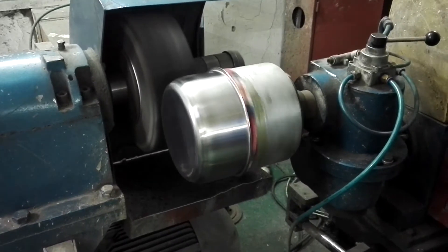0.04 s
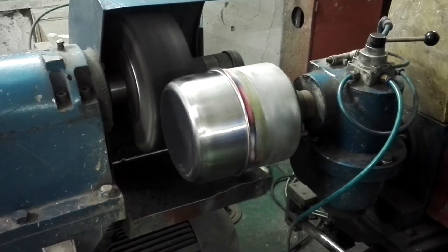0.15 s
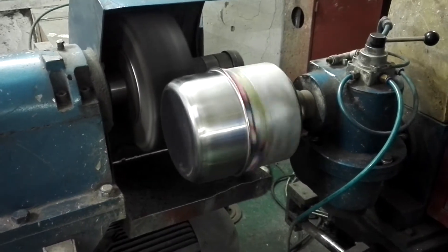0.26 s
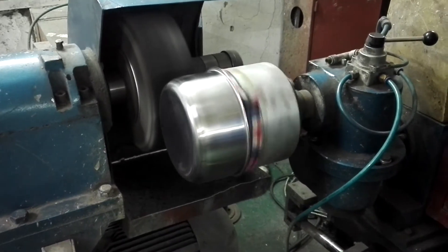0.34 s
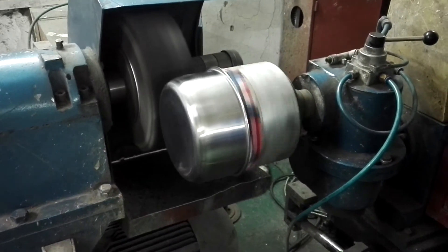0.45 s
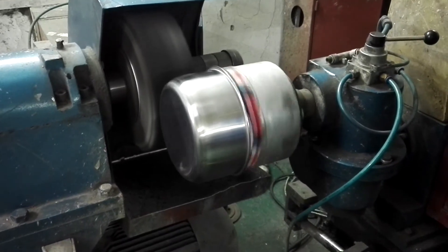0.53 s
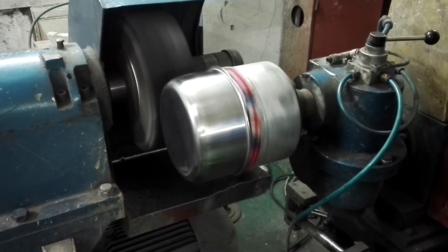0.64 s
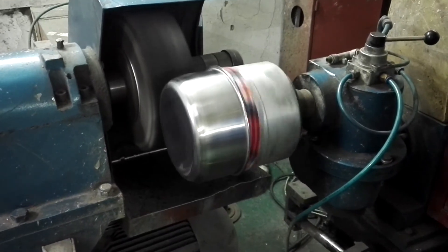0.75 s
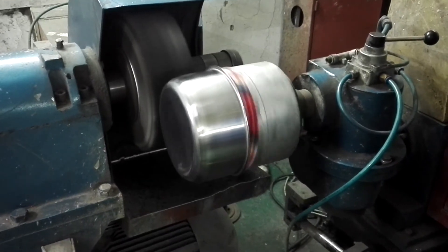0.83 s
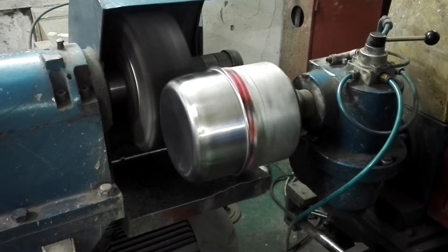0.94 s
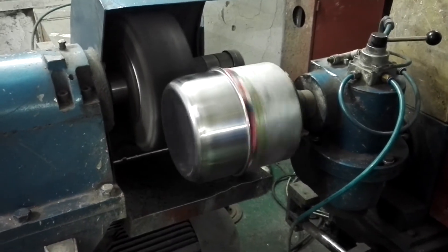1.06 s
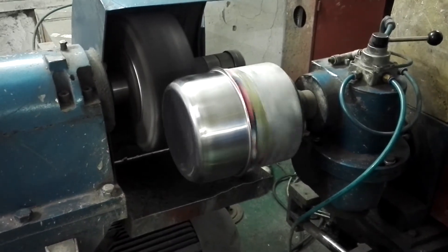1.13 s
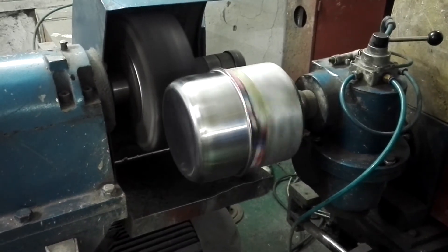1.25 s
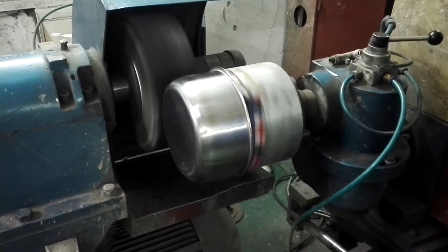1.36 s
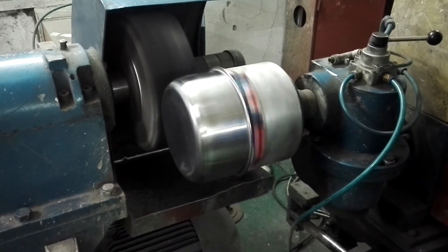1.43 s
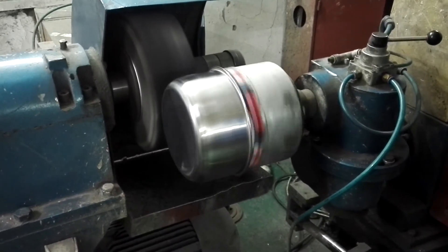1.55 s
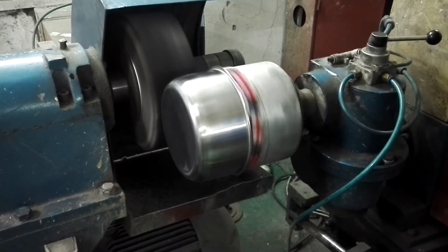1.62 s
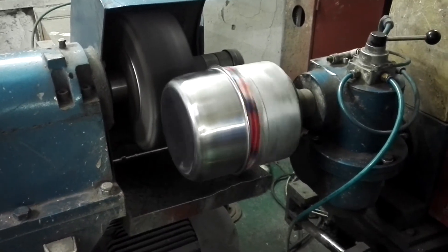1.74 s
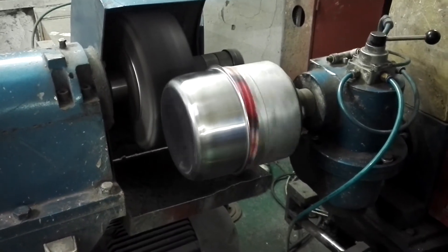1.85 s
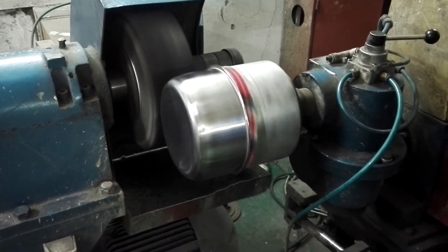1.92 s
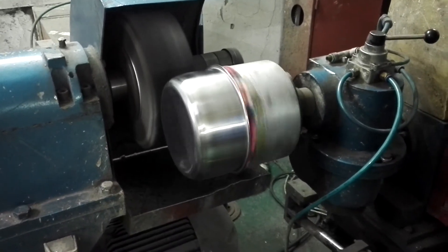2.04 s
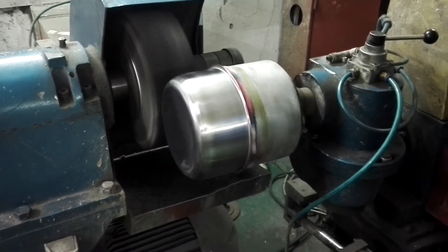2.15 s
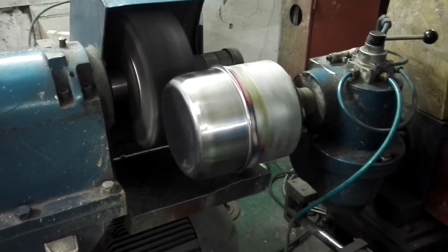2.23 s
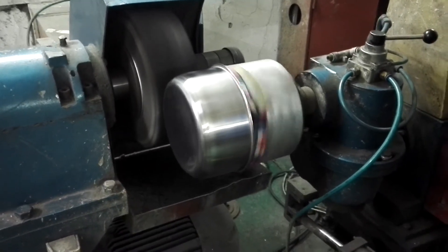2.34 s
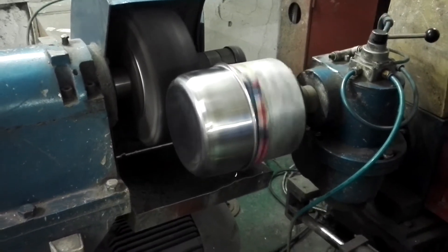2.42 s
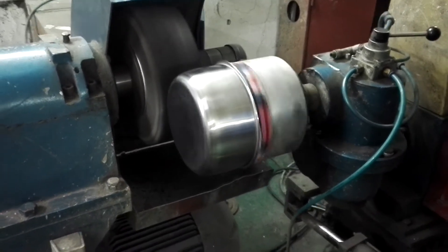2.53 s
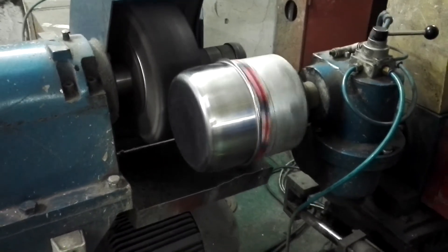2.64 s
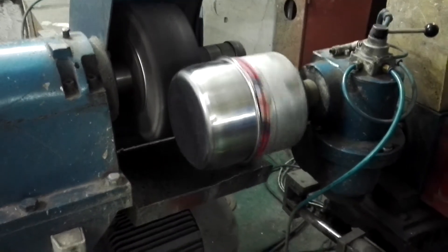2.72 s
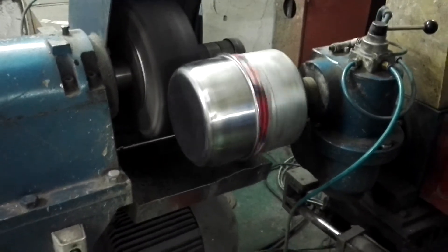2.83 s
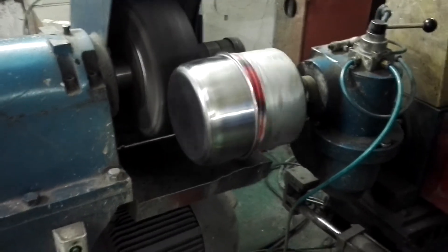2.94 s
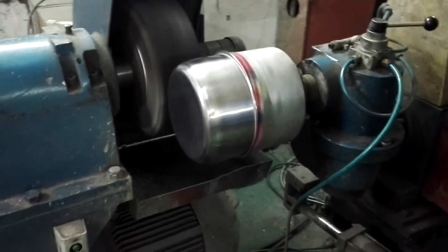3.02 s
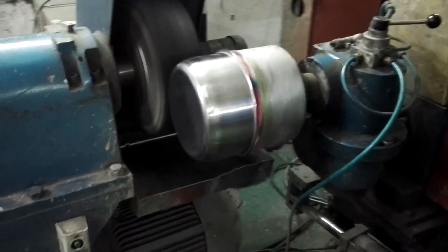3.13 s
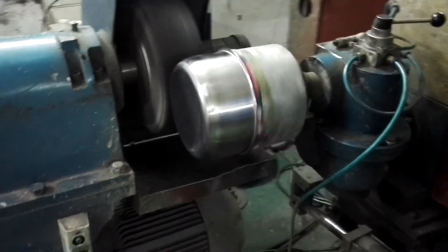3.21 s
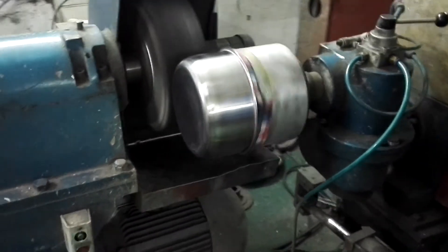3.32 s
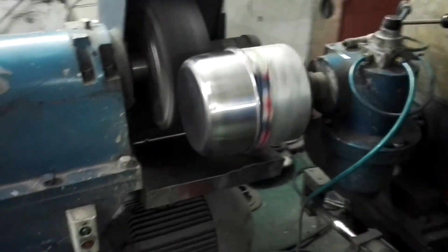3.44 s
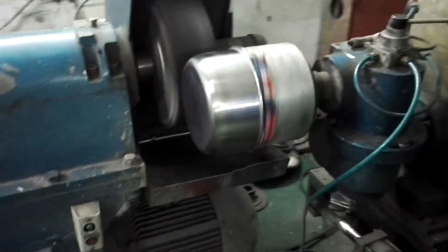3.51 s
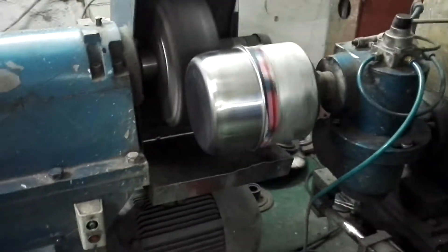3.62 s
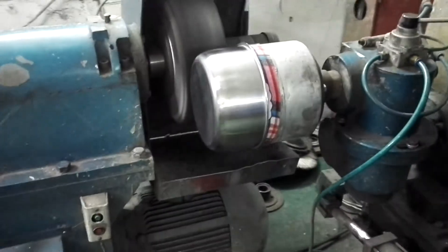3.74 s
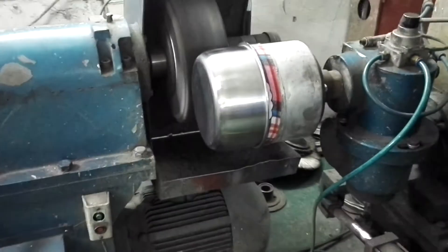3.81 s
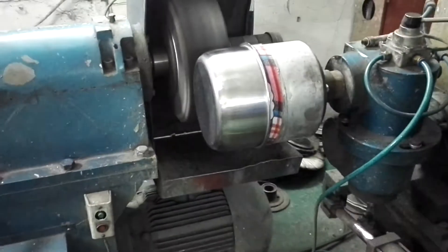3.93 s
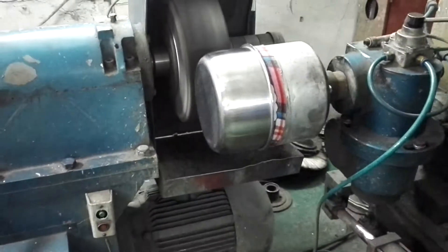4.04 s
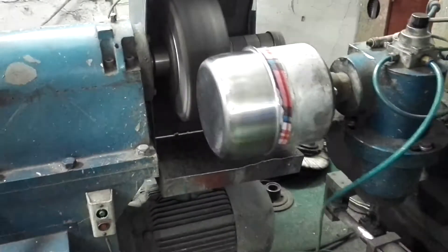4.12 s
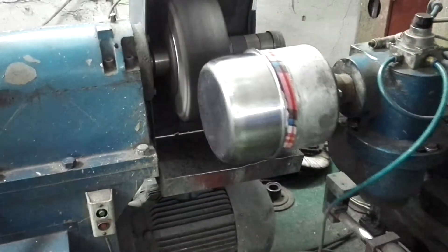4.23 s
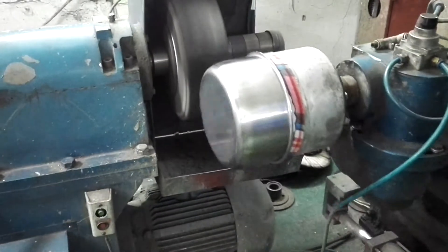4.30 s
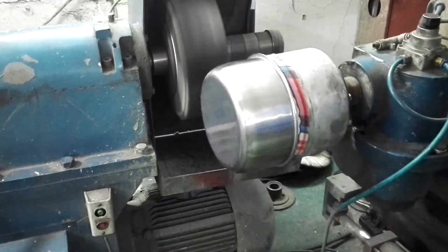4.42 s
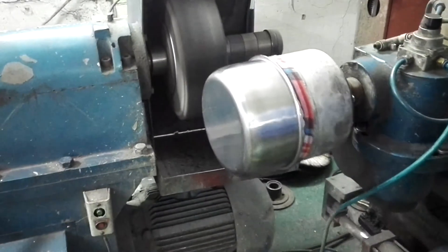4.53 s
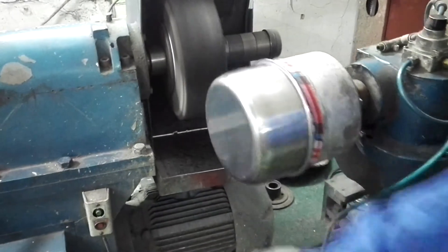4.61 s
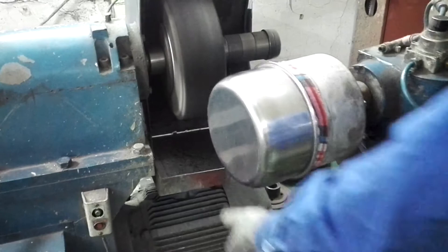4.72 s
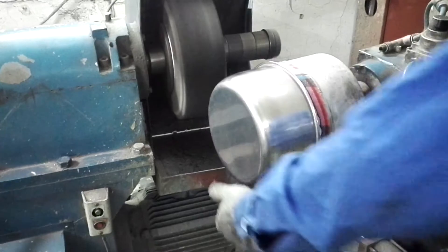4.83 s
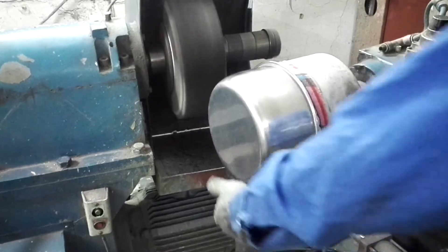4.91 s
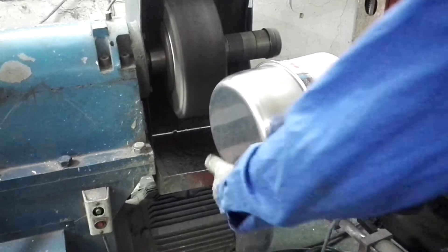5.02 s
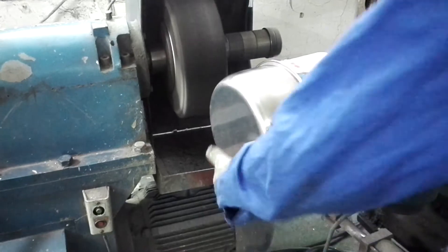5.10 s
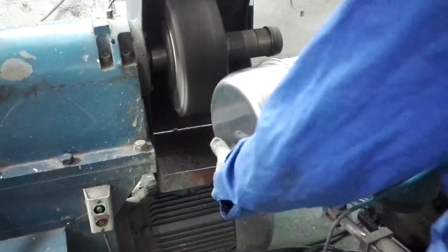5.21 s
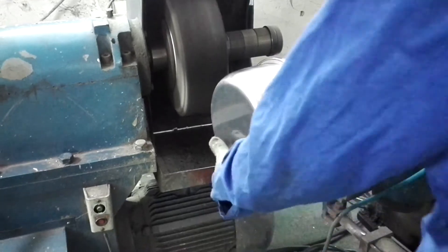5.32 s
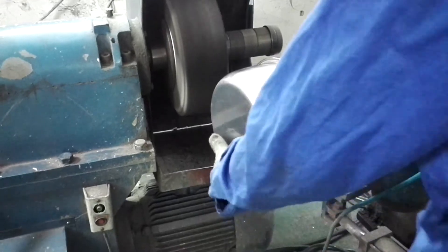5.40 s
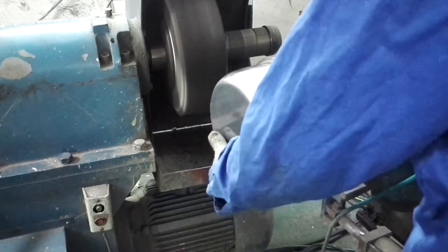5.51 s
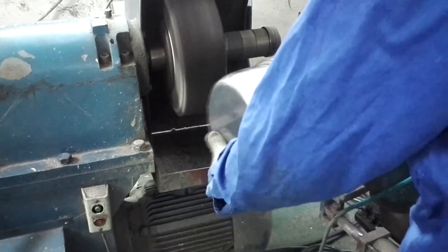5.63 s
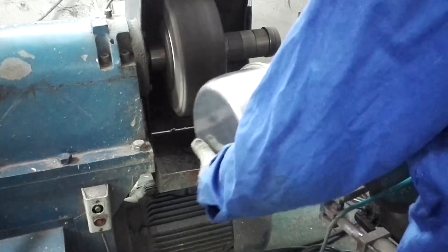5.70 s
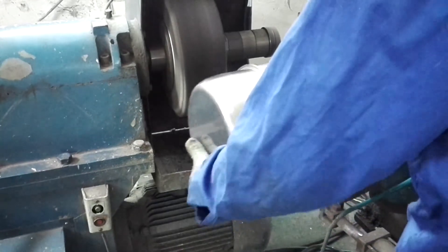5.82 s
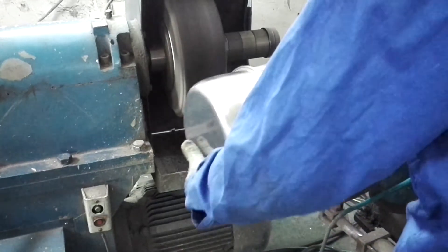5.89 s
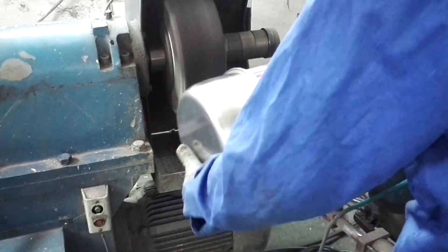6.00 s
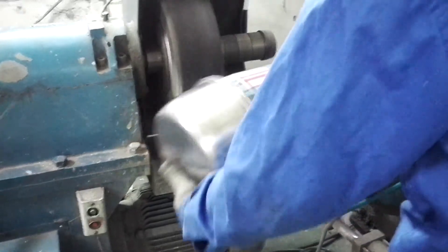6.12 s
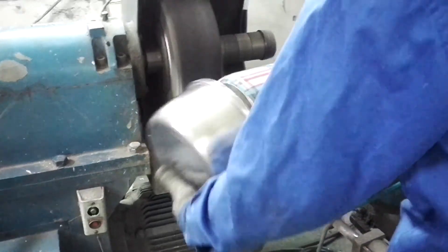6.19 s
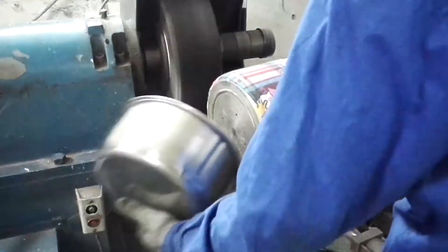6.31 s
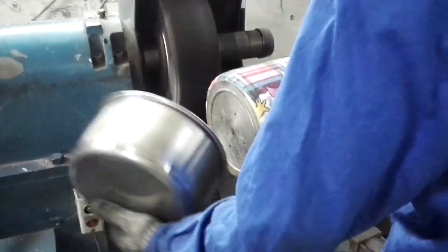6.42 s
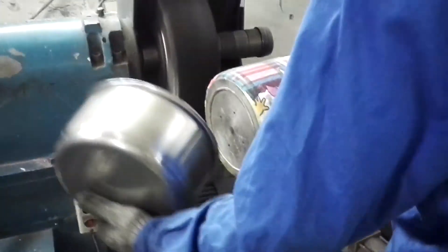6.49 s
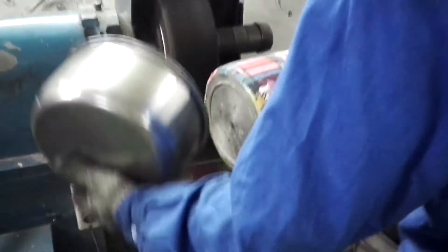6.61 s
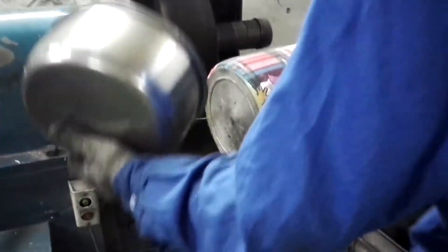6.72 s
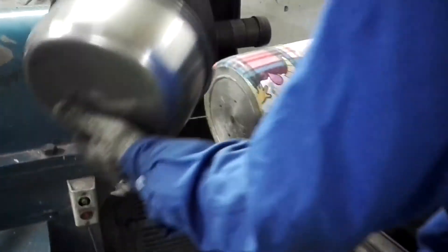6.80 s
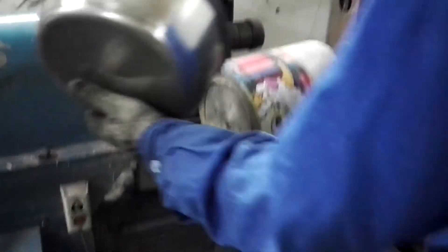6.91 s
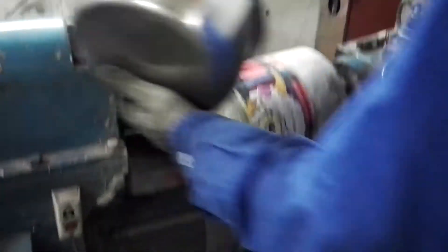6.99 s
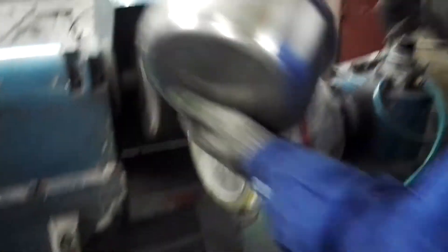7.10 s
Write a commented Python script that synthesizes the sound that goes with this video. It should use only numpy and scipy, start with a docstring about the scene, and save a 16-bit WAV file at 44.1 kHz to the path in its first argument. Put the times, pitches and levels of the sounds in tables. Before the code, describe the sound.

From 0 to 2.9 seconds, a flap wheel grinds a steel pot close by: dense, loud, bright gritty hiss, a rough buzz at about 37 pulses per second, and a ringing, roaring shell. Pressure swells about once a second, with heavier, shaking bites near 0.7-1.1 and 1.7-2.1. From 2.5 the roar softens and the rim rings out as the pot pulls away; around 2.95 grinding falls off, with flap tips skimming lightly until about 3.3. Bright air vents from 3.0 to 5.0, duller and shifted left after 4.6, with a soft bump near 4.45. A softer jet surges at 5.1, settling until 6.1; at 5.5 the pot pops loose with a dull gulp, short hollow ring and tiny second knock. Faint bumps come near 6.6, 6.75 and 7.0. Two low motor hums beat throughout, over fans and leaking air in a lightly reverberant workshop.

```python
"""A flap wheel grinds a slowly turning steel pot: its flaps buzz and slap, its grains hiss, the shell roars.
The pot swings clear, the flap tips skim it, and air vents brightly until an arm reaches past.
A softer jet then blows, the pot pops off its mandrel with a hollow ring, and soft bumps follow.
Two motors beat, and fans and leaking air hiss throughout.
Buzz, ring and hums are sums of sine waves; the air, grit and slap are noise shaped in pitch and level."""
import sys
import numpy as np
from scipy import signal
from scipy.fft import rfft, irfft
from scipy.io import wavfile
from scipy.ndimage import uniform_filter1d, map_coordinates

SR = 44100
rng = np.random.default_rng(int(sys.argv[2]) if len(sys.argv) > 2 else 0)


def transcribe(u):
    """Save the signal u as a 16-bit wav file named by the first command-line argument.

    u: samples, shape (n,) or (channels, n), limited to [-1, 1]; the rate is SR.
    q: integer samples, one column per channel.
    """
    v = np.clip(np.atleast_2d(u).T, -1, 1)
    q = np.round(v * 32767).astype(np.int16)
    wavfile.write(sys.argv[1], SR, q)


N = 315306
TIME = np.arange(N) / SR  # seconds
BINS = np.fft.rfftfreq(N, 1 / SR)  # Hz

WHEEL_HZ, SPIN_UP_S = 37.074, .1  # the wheel under load; time a freed machine takes to change
POT_TURN_S = 1
RELEASE_S, DROP_S = 2.955, 0.088  # the pot swings clear; how long the drop in level takes
PULL_S, PULL_LENGTH_S = 2.52, 0.31  # the pot starts to pull away
# left-right balance of the workshop and the jet: pitch_hz, left_minus_right_db
SHOP_BALANCE = [(200, -1), (1400, 1), (2200, -2.5), (5000, -3), (8500, 4), (11000, 2.5), (13000, 7)]


def gain_of(db):
    """Turns decibels into a factor."""
    return 10 ** (np.asarray(db) / 20)


def evened(x):
    """Scales a sound to an average strength (rms) of 1."""
    return x / np.sqrt(np.mean(x ** 2) + 1e-20)


def read(points, hz):
    """Reads a table's curve at the given pitches, with straight lines on a log pitch scale."""
    f, value = np.transpose(points)
    return np.interp(np.log(hz + 1), np.log(f + 1), value)


def since(s):
    """Seconds gone by since a moment, 0 before it."""
    return np.maximum(TIME - s, 0)


def ramp(s, length):
    """Rises from 0 to 1, starting at a moment."""
    return np.minimum(since(s) / length, 1)


def drift(rate):
    """Slow random wandering of rms 1, changing at about the given rate in Hz."""
    return evened(irfft(rfft(rng.standard_normal(N)) / (1 + (BINS / rate) ** 4), N))


def ripple(width_hz):
    """Steady peaks and deeper dips that nearby reflections put into each channel's spectrum."""
    points = np.minimum(rng.standard_normal((2, 2000)), 1)
    return np.array([np.interp(BINS / width_hz, np.arange(len(p)), p) for p in points])


def colour(pair, spectrum, ripple_db):
    """Two unrelated signals become a stereo sound of the given spectrum, rms 1."""
    # how alike left and right are: pitch_hz, likeness (1 = same, 0 = unrelated)
    likeness = [(30, 0.37), (100, 0.96), (300, 0.92), (700, 0.53), (1400, -0.042), (2800, 0.42),
                (5000, -0.0061), (14000, -0.09)]
    a, b = rfft(pair)
    same = np.clip(read(likeness, BINS), -1, 1)
    different = np.sqrt(1 - same ** 2)
    stereo = np.array([a, same * a + different * b])
    level_db = read(spectrum, BINS) + ripple_db * ripple(70) * different
    return evened(irfft(stereo * gain_of(level_db), N))


def hiss(spectrum, ripple_db):
    """Random noise of the given spectrum, like rough, rushing air."""
    return colour(rng.standard_normal((2, N)), spectrum, ripple_db)


def patchy(x, depth_db):
    """Shifts the colour of a rushing sound from moment to moment."""
    z = signal.stft(x, nperseg=1024)[2]
    field = rng.standard_normal(z.shape[1:])
    field = uniform_filter1d(field, size=4, axis=0)  # smooth over pitch
    field = uniform_filter1d(field, size=7, axis=1)  # smooth over time
    gain = gain_of(depth_db * np.minimum(evened(field), 1))
    return evened(signal.istft(z * gain, nperseg=1024)[1][:, :N])


def lows(x, edge_hz):
    """The part of a sound below an edge."""
    return irfft(rfft(x) / (1 + (BINS / edge_hz) ** 10), N)


def panned(db):
    """Left and right gains for a level difference."""
    return gain_of(np.array([db, -db]) / 2)


def placed(x, balance):
    """Leans each pitch band to the left or right."""
    return irfft(rfft(x) * panned(read(balance, BINS)), N)


def grinding():
    """Buzz, slap and roar follow the pot's pressure, grit holds steady between bites;
    heavy bites add grit and shake the machine."""
    # heavy bites of the wheel: start_s, length_s, shake_db, extra_grit_db
    bites = [(0.655, 0.44, -38, 2.1), (1.655, 0.42, -39.5, 2)]
    # rough roar of the shell: pitch_hz, level_db (per Hz)
    roar_colour = [(40, -42), (300, -20), (600, -13), (780, 4), (900, -2), (1080, 2), (1200, 1), (1450, 3),
                   (1900, -17)]
    # the shaking machine: pitch_hz, level_db (per Hz)
    shake_colour = [(15, -20), (35, -15), (150, -14), (700, -13), (2000, -29)]
    # left-right balance of the grinding: pitch_hz, left_minus_right_db
    balance = [(30, 23), (110, 2), (370, -1), (690, 2), (1270, -1.5), (2340, 0.5), (4300, -2), (7900, 1.5),
               (10200, 2), (11100, 3.5), (12500, 5), (14200, 4)]
    free_wheel_hz = 37.36
    runout_turns, runout_s = .0065, .66  # the high side shifts the contact point; it leads most at this time
    buzz_stop_db_per_s = 7  # on release the clean buzz dies faster than the rough layers
    pull_roar_db = -5  # the roar softens as the pot pulls away
    jolt_db, jolt_hz = 2.5, 19  # the shaking comes in uneven jolts

    speed_hz = WHEEL_HZ + (free_wheel_hz - WHEEL_HZ) * ramp(RELEASE_S, SPIN_UP_S) + .01 * drift(8)
    turns = np.cumsum(speed_hz) / SR
    turns = turns + runout_turns * np.cos(2 * np.pi * (TIME - runout_s) / POT_TURN_S)
    shake, grit_db = 0, -16.5
    for start, length, shake_db, extra_db in bites:
        arch = np.sin(np.pi * ramp(start, length))
        shake = shake + gain_of(shake_db) * arch
        grit_db = grit_db + extra_db * arch
    buzz_db = -29 - buzz_stop_db_per_s * since(RELEASE_S)
    roar_db = -40 + pull_roar_db * ramp(PULL_S, PULL_LENGTH_S)
    sound = contact(buzz_db, swell_db=1.0, drop_db=3) * buzz(turns)
    sound += contact(-28.5, swell_db=0.7, drop_db=3) * slap(turns)
    sound += contact(grit_db, swell_db=0, drop_db=-0.5) * grit(turns)
    sound += contact(roar_db, swell_db=1, drop_db=-4.5) * hiss(roar_colour, 2.8)
    sound += shake * gain_of(jolt_db * drift(jolt_hz)) * hiss(shake_colour, 1)
    return placed(sound + skim(turns), balance)


def pressure():
    """The pot runs out of true: its pressure on the wheel builds quickly and eases slowly, once a turn."""
    high_side_s, lean = 0.97, 0.18  # when the high side passes; how lopsided the swing is
    angle = 2 * np.pi * (TIME - high_side_s) / POT_TURN_S
    return np.cos(angle) - lean * np.sin(2 * angle)


def contact(db, swell_db, drop_db):
    """Gain of a layer: it swells with the pressure by swell_db, steps on release (minus = up), dies away."""
    fade_db_per_s = 37
    step_db = drop_db * ramp(RELEASE_S, DROP_S)
    return gain_of(db + swell_db * pressure() - step_db - fade_db_per_s * since(RELEASE_S))


def buzz(turns, waver=0.18, spread=0.82, scatter=1.18, soft_flaps=0.049, count=76):
    """Uneven flaps beat the pot alike every turn: multiples of the wheel's pitch, shaped by resonances."""
    # the stiffest flaps: place_turns round the wheel, strength (plain factor)
    flaps = [(0, 1), (.4664, .21), (.6496, .32), (.698, .47)]
    # the pot's broad answer to a blow: pitch_hz, level_db
    body = [(37, -31), (110, -48), (170, -24), (450, -15.5), (1200, -17.5), (1700, -18), (2300, -15),
            (2850, -10.5)]
    # resonances of the clamped pot and its mandrel: pitch_hz, width_hz, level_db
    resonances = [(213, 88, 11.5), (333.5, 23, 6.5), (420.6, 47, 11.5), (485, 20, 0.5), (602.6, 63, 10),
                  (709.4, 85, 16.5), (792.2, 38, 14.5), (875, 46, 5.5), (964, 66, 11), (1082.4, 12.9, 26),
                  (1280.4, 34.5, 25.5), (1455.6, 60, 15.5), (1597, 21, 5.5), (2023, 49, 19.5)]
    pull_rim_db, rim_drop_db = 10.5, 6  # the rim rings out during the pull, then drops on release
    drop = ramp(RELEASE_S, DROP_S)
    shell_db = 2.5 * pressure() - 9.5 * drop
    rim_db = pull_rim_db * ramp(PULL_S, PULL_LENGTH_S) - rim_drop_db * drop
    # the shell's main ring, the rim, and a higher ring that sings under pressure (Hz, width Hz, dB)
    rings = [(720, 36, shell_db), (1041, 36, rim_db), (1310, 160, 1 * pressure())]

    out = np.zeros((2, N))
    spin, wave = np.exp(2j * np.pi * turns), np.ones(N, complex)
    for order in range(1, count + 1):
        height, hz = order / count, order * WHEEL_HZ
        wave = wave * spin
        blows = sum(strength * np.exp(-2j * np.pi * order * place) for place, strength in flaps)
        force = np.sqrt(abs(blows) ** 2 + abs(soft_flaps))
        # complex decibels give both gain and lag
        peaks = sum(db / (1 + 2j * (hz - centre) / width) for centre, width, db in resonances)
        pot = gain_of(read(body, hz) + peaks)
        # random phases soften the blows, most in the treble, so that they do not click
        phase_scatter = scatter + (hz / 1300) ** 3
        phase = np.angle(blows) + phase_scatter * rng.standard_normal()
        # higher orders reach left and right further out of step
        offset = spread * rng.choice([-1, 1]) * (0.69 + height)
        ports = np.exp(1j * (phase + np.array([[0], [offset]])))
        sway_points = rng.standard_normal((70, 2)) @ [1, 1j]
        sway = np.interp(TIME, np.linspace(0, TIME[-1], 70), sway_points)
        ring_db = sum(db / (1 + ((hz - centre) / width) ** 4) for centre, width, db in rings)
        tone = (pot * ports * wave * (1 + waver * (.5 + height) * sway)).real
        out += force * gain_of(ring_db) * tone
    return evened(out)


def slap(turns):
    """The flap edges scrape the steel much alike each turn and ring the wall's high modes."""
    # slap of the flaps: pitch_hz, level_db (per Hz)
    slap_colour = [(2100, -30.5), (2300, -4), (4000, -1.5), (7000, 1), (14000, -18.5)]
    # high modes of the steel wall: pitch_hz, width_hz, level_db
    wall = [(2346, 40, 12), (2396, 110, 9.5), (2724, 135, 12.5), (3037, 37, 15), (3182, 76, 14.5),
            (3342, 50, 17), (3420, 91, 5), (3820, 130, 14.5), (4144, 140, 11), (4440, 110, 9.5),
            (4670, 150, 11), (4900, 82, 11), (5240, 78, 9.5), (5500, 120, 13), (5810, 120, 9)]
    wall_db = sum(db / (1 + (2 * (BINS - hz) / width) ** 4) for hz, width, db in wall)
    spectrum = np.transpose([BINS, read(slap_colour, BINS) + wall_db])
    return colour(scrape(turns, wander=0.57), spectrum, 0.34)


def scrape(turns, wander):
    """A noise pattern that repeats once a wheel turn; it shifts slowly as the pot rolls on."""
    size = round(SR / WHEEL_HZ)
    place = [turns % 1 * size]
    patterns = irfft(np.exp(2j * np.pi * rng.random((3, 2, size // 2 + 1))), size)
    steady, early, late = (
        np.array([map_coordinates(p, place, order=3, mode="grid-wrap") for p in pair]) for pair in patterns)
    quick, slow = wander * drift(1.16), wander * drift(1.0)
    # dividing keeps the strength even while the mix changes
    return (steady + quick * early + slow * late) / np.sqrt(1 + quick ** 2 + slow ** 2)


def grit(turns, throb_db=-0.7, flicker_db=0.5, grain_db=0.9):
    """Countless grains cut the steel, a little harder once a wheel turn: noise of uneven strength."""
    # grit tearing at the steel: pitch_hz, level_db (per Hz)
    grit_colour = [(25, -40), (100, -15), (400, -16), (730, -7), (1150, -12), (1450, -5.5), (1750, -6.5),
                   (2150, -4.5), (2500, -2.5), (6000, -1.5), (7200, 1), (8800, 2), (10400, 7), (11700, 4.3),
                   (12350, 6.3), (13300, 3.7), (14300, 1.5)]
    # as the steel gets smooth, the top of the hiss fades
    smooth_s, smooth_db_per_s, smooth_above_hz = 1.7, 3.5, 11900
    press_db = throb_db * np.cos(2 * np.pi * turns) + flicker_db * drift(30)
    grains = rng.standard_normal((2, N)) * gain_of(grain_db * np.minimum(rng.exponential(1, N), 2))
    cut = patchy(colour(grains * gain_of(press_db), grit_colour, 1.6), depth_db=1.8)
    low = lows(cut, smooth_above_hz)
    return low + (cut - low) * gain_of(-smooth_db_per_s * since(smooth_s))


def skim(turns):
    """Around the release the flap tips start to skim the departing pot, a light scrape until it is clear."""
    # the light skimming: pitch_hz, level_db (per Hz)
    skim_colour = [(120, -33), (220, 3), (420, -11), (560, -5), (780, 3), (1500, 5), (1900, 3.5), (2330, 7),
                   (3000, -2), (6000, -3), (14000, -9)]
    clear_s, clear_db_per_s = 3.29, 96  # the tips lose touch
    fade_db = -35 - 14 * since(RELEASE_S) - clear_db_per_s * since(clear_s)
    touch = ramp(RELEASE_S - DROP_S, DROP_S)
    return touch * gain_of(fade_db) * colour(scrape(turns, wander=0.6), skim_colour, 2)


def valve(opens, attack, closes, release_db_per_s, db):
    """Gain of an air stream: it opens, holds and dies away."""
    return ramp(opens, attack) * gain_of(db - release_db_per_s * since(closes))


def vent(flutter_db=0.77):
    """The chuck vents with a bright hiss, which dulls and moves left as an arm reaches past."""
    # the vent's valve: opens_s, attack_s, closes_s
    vent_times = (3.0, 0.24, 5.03)
    # venting air: pitch_hz, level_db (per Hz)
    vent_colour = [(600, -29), (1200, -21), (2300, -18), (3000, -14.5), (4300, -14.5), (5400, -12.5),
                   (6300, -6), (8600, -3.5), (9900, 0.5), (11000, 2), (11650, 5.7), (12300, 0.7),
                   (13400, -5.5), (14000, -3), (14300, -5)]
    # left-right balance of the vent: pitch_hz, left_minus_right_db
    balance = [(2000, -3.5), (5500, -9.5), (7000, -4), (10200, 2.5), (11000, -13.5), (12400, 10),
               (14200, 0)]
    arm_s, arm_move_s, arm_pan_db = 4.604, 0.064, 5
    top_shade_db_per_s, low_shade_db_per_s = 26, 8  # the arm shades the treble most
    rush = placed(patchy(hiss(vent_colour, 1.4), depth_db=1.6), balance)
    low = lows(rush, 6000)
    shaded = low * gain_of(-low_shade_db_per_s * since(arm_s))
    shaded += (rush - low) * gain_of(-top_shade_db_per_s * since(arm_s))
    flow = valve(*vent_times, release_db_per_s=75, db=-25.5) * gain_of(flutter_db * drift(19))
    return flow * panned(arm_pan_db * ramp(arm_s, arm_move_s)) * shaded


def jet():
    """A softer jet of air surges, settles and pushes the pot off."""
    # the jet's valve: opens_s, attack_s, closes_s
    jet_times = (5.09, 0.09, 6.1)
    # the jet's air: pitch_hz, level_db (per Hz)
    jet_colour = [(350, -39), (660, -6), (800, -8.5), (1200, -9.5), (1430, -3.5), (1700, -2), (2000, -1.5),
                  (2900, -4.5), (4600, -5.5), (6400, -4.5), (8800, -2.5), (10500, -1.5), (12400, -0.5),
                  (14200, -8)]
    surge_db, surge_s = 4.5, 0.16  # the first rush, before the pressure settles
    surge = gain_of(surge_db * np.exp(-since(jet_times[0]) / surge_s))
    rush = patchy(hiss(jet_colour, 2.2), depth_db=1.4)
    return placed(valve(*jet_times, release_db_per_s=105, db=-38.5) * surge * rush, SHOP_BALANCE)


def pop(wet_db=-10):
    """The seal gulps and lets go with a dull knock; the hollow pot's fading modes waver in the hand."""
    # the pot pops off the mandrel, then a fainter pop of the same kind follows: start_s, level_db
    pops = [(5.502, -29.5), (5.549, -42)]
    # the free pot's air, dull contact and ringing shell: pitch_hz, level_db, t60_s (fall by 60 dB), swell_s
    modes = [(212, 6, 0.09, 0.003), (302, -12.5, 0.3, 0.01), (565, 5, 0.042, 0.004), (670, 6, 0.04, 0.004),
             (860, -2, 0.035, 0.004), (644.7, -6, 0.56, 0.018), (660, -14, 0.5, 0.025),
             (924, -14, 0.28, 0.025), (1424, -15, 0.85, 0.012)]
    waver_db = 2
    # air gulps through the opening seal, starting just before the contact
    gulp_hz, gulp_db, gulp_lead_s, gulp_s = 173, -4, 0.0095, 0.017
    out = np.zeros(N)
    for s, db in pops:
        t, early = since(s), s - gulp_lead_s
        ring = 0
        for hz, level, t60, swell in modes:
            waver = gain_of(waver_db * drift(30) * ramp(s, .03))
            fade = ramp(s, swell) * np.exp(-np.log(1000) * t / t60)
            ring = ring + gain_of(level) * waver * fade * np.sin(2 * np.pi * hz * t)
        gulp = np.sin(np.pi * ramp(early, gulp_s)) * np.sin(2 * np.pi * gulp_hz * since(early))
        out += gain_of(db) * (ring + gain_of(gulp_db) * gulp)
    return out + gain_of(wet_db) * room(out)


def room(x):
    """Sparse reflections of random sign, each pitch band dying at its own speed."""
    # the workshop's ring: pitch_hz, t60_s (fall by 60 dB)
    decay = [(200, 0.49), (1000, 0.47), (4000, 0.83), (12000, 0.47)]
    present = (rng.random((2, SR)) < .06) * (TIME[:SR] > .006)  # none in the first 6 ms
    taps = rng.choice([-1., 1.], (2, SR)) * present
    hz, t, z = signal.stft(taps, SR, nperseg=256)
    tail = signal.istft(z * gain_of(-60 * t / read(decay, hz)[:, None]), SR, nperseg=256)[1]
    return signal.fftconvolve(np.atleast_2d(x), tail / np.linalg.norm(tail[0]), axes=1)[:, :N]


def handling(rise=0.018):
    """Soft, dull bumps of noise swell and die as the chuck swings and the pot is handled."""
    # the bumps: start_s, length_s, level_db (before the swell and fade)
    bumps = [(4.435, 0.068, -52), (6.572, 0.11, -60), (6.722, 0.1, -53), (6.994, 0.1, -51)]
    # a soft bump: pitch_hz, level_db (per Hz)
    bump_colour = [(80, -20), (190, 1), (260, 8), (420, -24), (680, -20), (1000, -23), (1420, -11),
                   (2000, -39)]
    level = sum(gain_of(db) * ramp(s, rise) * np.cos(np.pi / 2 * ramp(s, length)) for s, length, db in bumps)
    return level * hiss(bump_colour, 1)


def motors(hum_lag=0.13):
    """Two hums a few hertz apart throb as they drift in and out of step, most deeply under load."""
    # each motor's pitch rises as its load goes: loaded_hz, free_hz, unloaded_s
    motor_pitches = [(111.18, 112.04, 3.1), (113.6, 114.42, 3.61)]
    # each hum's level: loaded_db, free_db
    motor_levels = [(-55, -59.5), (-55, -54)]
    in_step_s, waver_db = 0.22, 0.7  # the two hums add up at this moment
    out = np.zeros((2, N))
    for (loaded_hz, free_hz, unloaded_s), (loaded_db, free_db) in zip(motor_pitches, motor_levels):
        cycles = loaded_hz * (TIME - in_step_s) + (free_hz - loaded_hz) * since(unloaded_s)
        phase = 2 * np.pi * cycles
        db = loaded_db + (free_db - loaded_db) * ramp(unloaded_s, SPIN_UP_S)
        out += gain_of(db + waver_db * drift(4.6)) * evened(np.sin([phase, phase + hum_lag]))
    return out


def workshop():
    """Faint, wandering machine tones over the noise of fans, wheel wind and leaking air."""
    # fans, wind of the wheel and leaking air: pitch_hz, level_db (per Hz)
    shop_colour = [(25, -27), (60, -8), (113, -7), (160, -5.5), (250, -5), (450, -10.5), (700, -11.5),
                   (1080, -19), (1370, -13.5), (2740, -21.5), (5180, -18), (5900, -13.5), (8500, -17),
                   (10100, -9), (14200, -14.5)]
    # faint machine tones: pitch_hz, level_db
    machine_tones = [(152.2, -90), (200.6, -69), (226, -64.5), (247.4, -68), (302.3, -67.5), (352.1, -66.5),
                     (499.5, -70), (612, -87), (702, -69), (1435, -70.5), (2032, -75)]
    tones = 0
    for hz, db in machine_tones:
        cycles = np.cumsum(hz + 1.61 * drift(6.2)) / SR
        tones = tones + gain_of(db) * evened(np.sin(2 * np.pi * cycles))
    air = placed(hiss(shop_colour, 2.4), SHOP_BALANCE)
    return tones + gain_of(-44.5 + .5 * drift(1.6)) * air


def scene():
    """Everything at the machine."""
    return grinding() + vent() + jet() + pop() + handling() + motors() + workshop()


def record(dry):
    """Cuts the highest treble with a steep filter."""
    edge_hz = 14240
    lowpass = signal.firwin(1201, edge_hz, window=("kaiser", 8), fs=SR)
    return signal.oaconvolve(dry, lowpass[None], "same")


dry = scene()
out = record(dry)
transcribe(out)
```